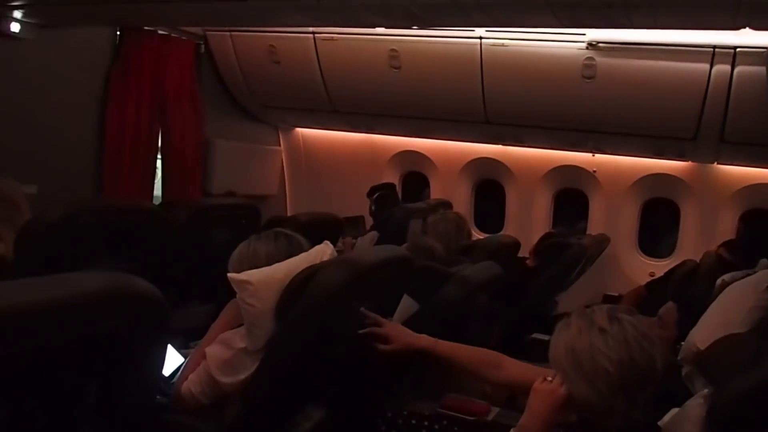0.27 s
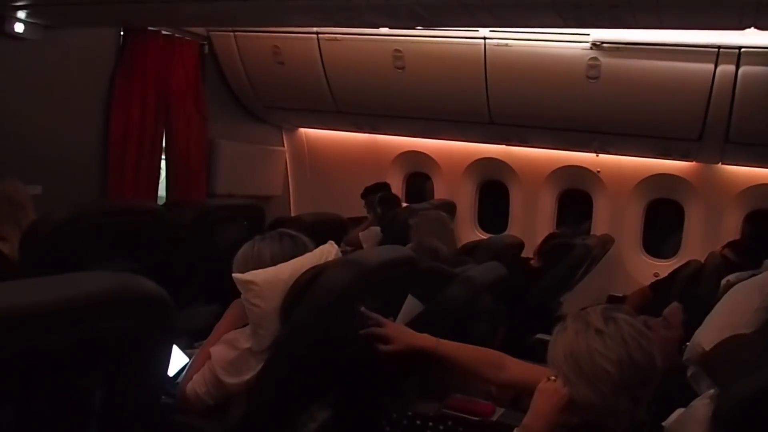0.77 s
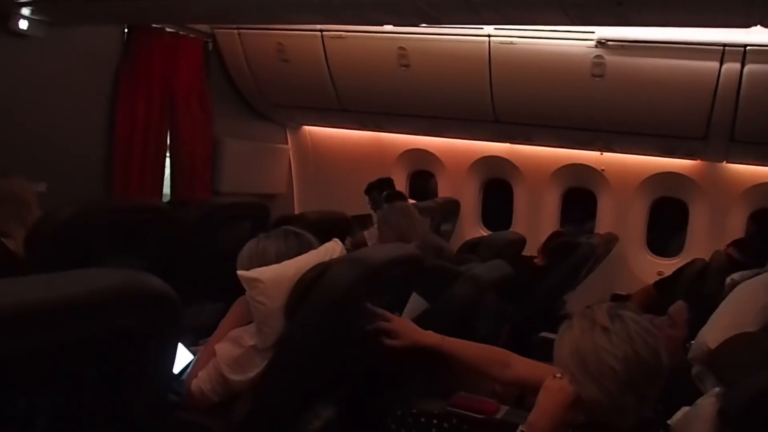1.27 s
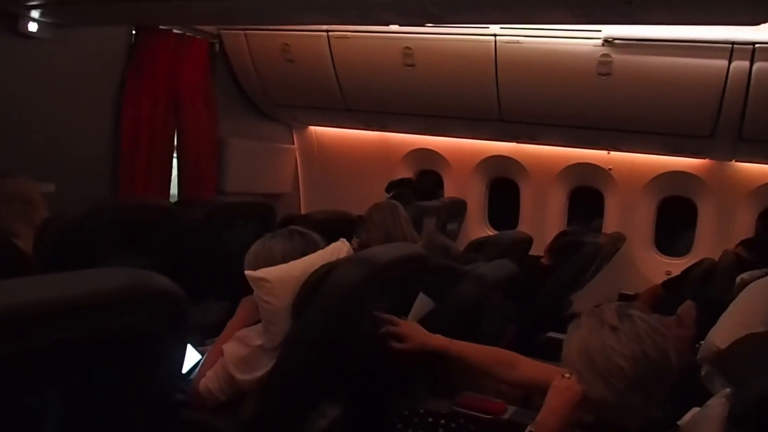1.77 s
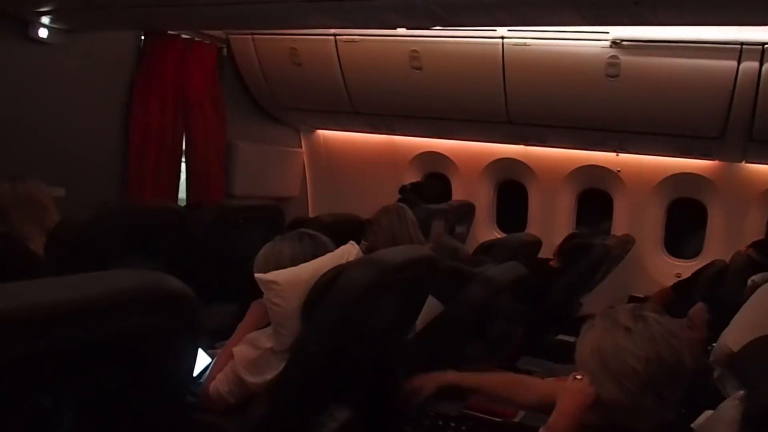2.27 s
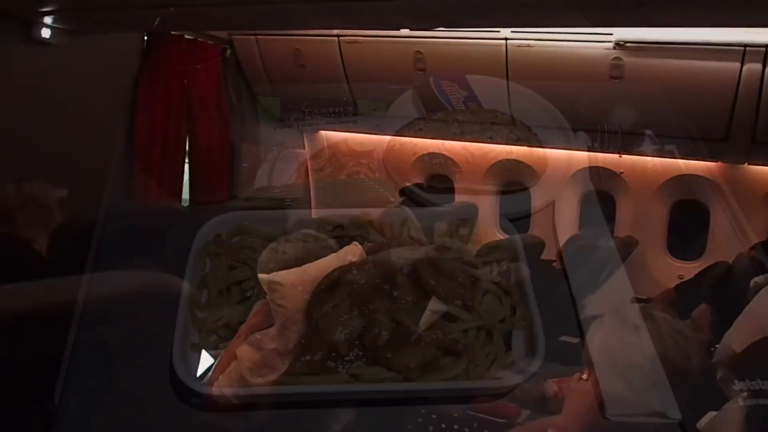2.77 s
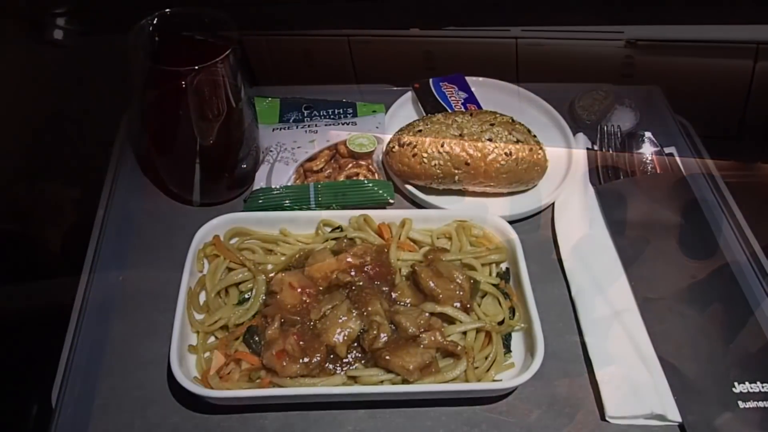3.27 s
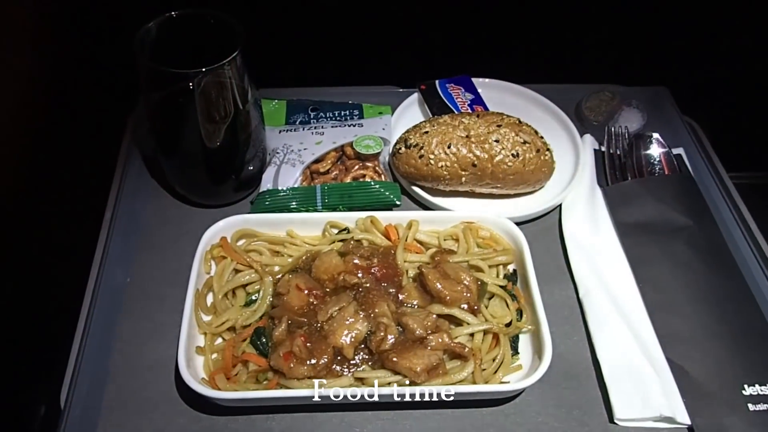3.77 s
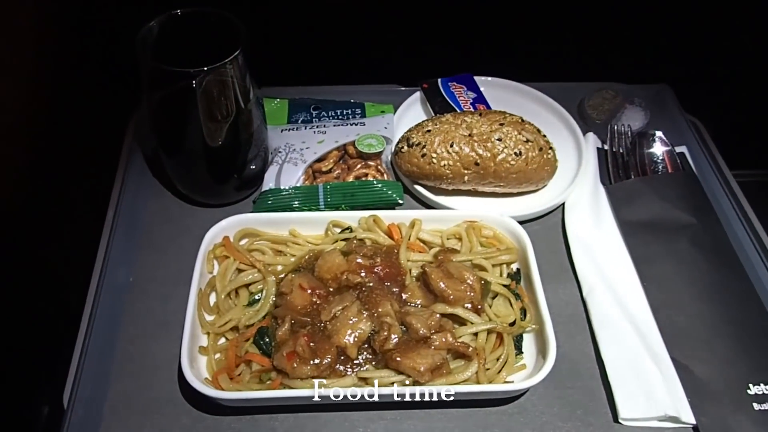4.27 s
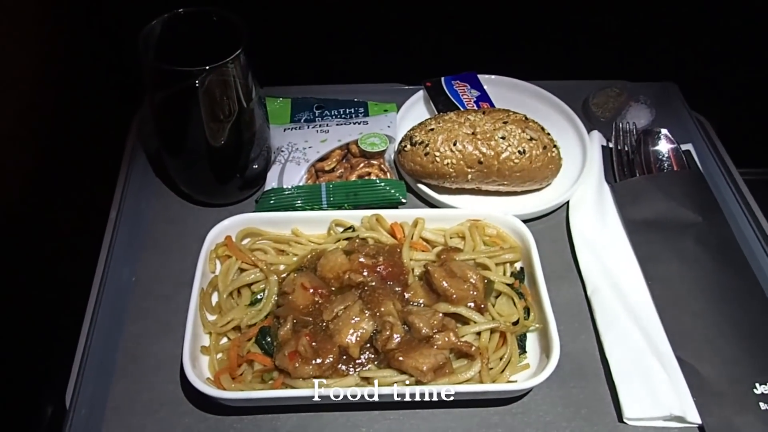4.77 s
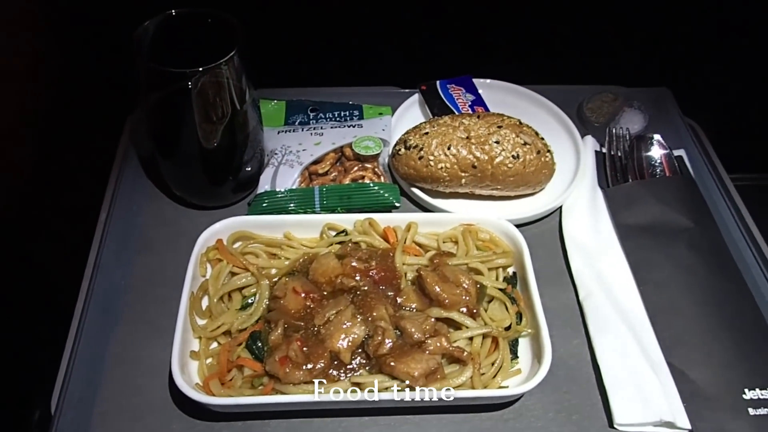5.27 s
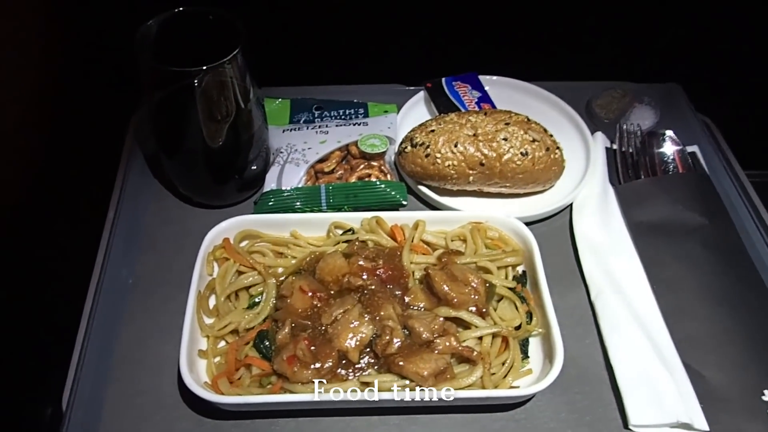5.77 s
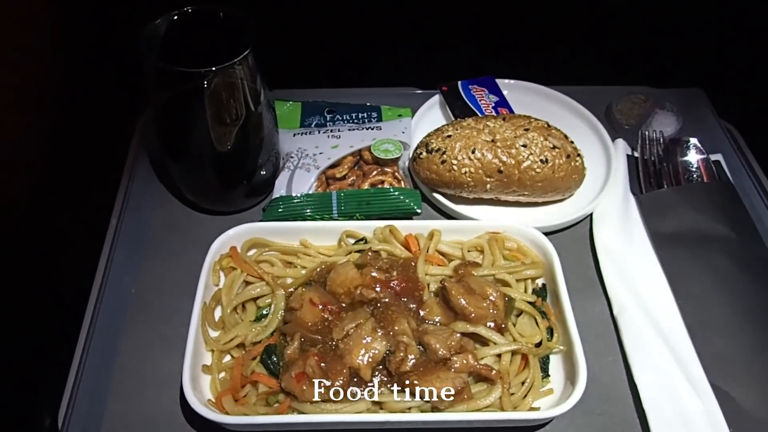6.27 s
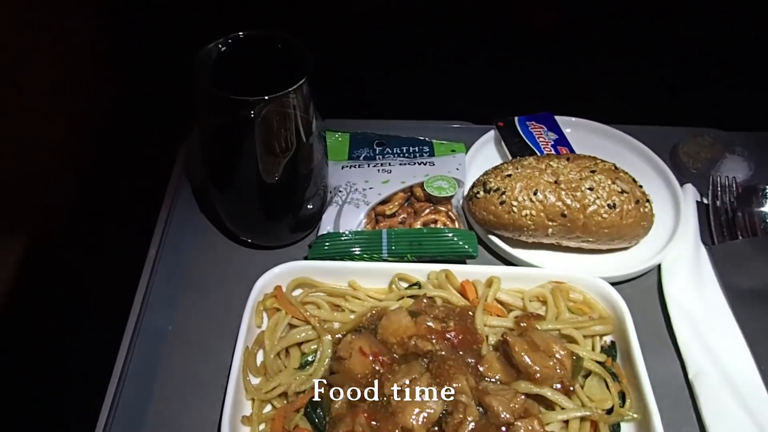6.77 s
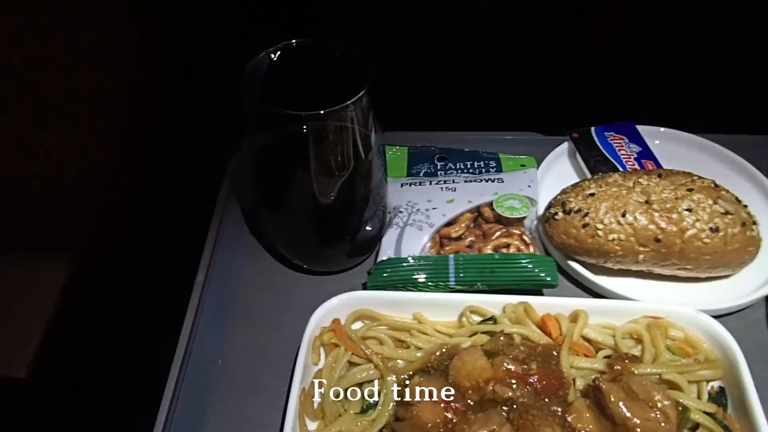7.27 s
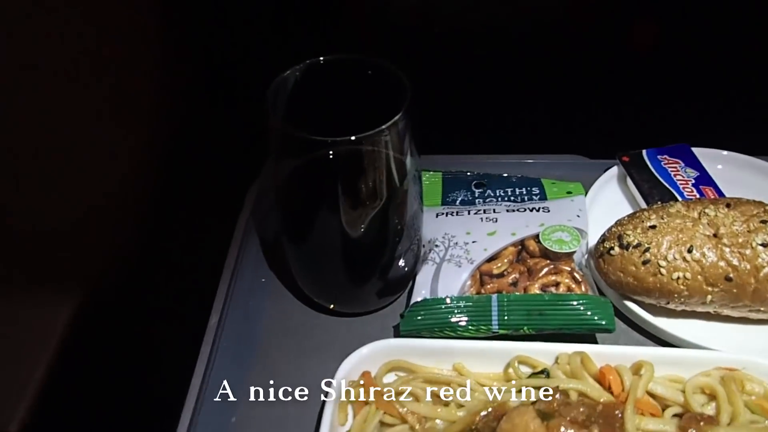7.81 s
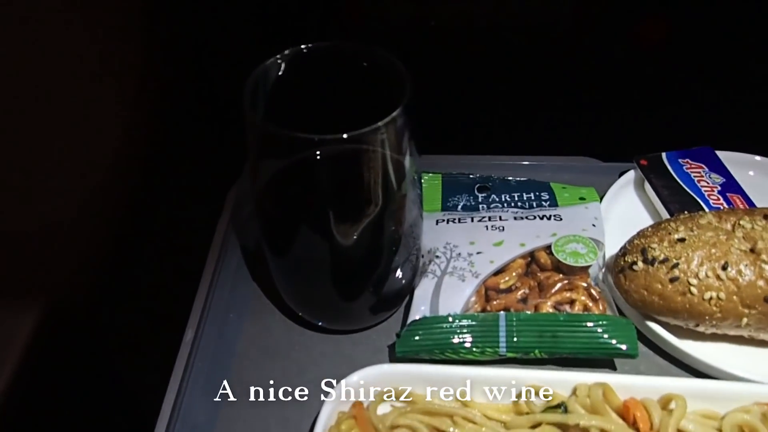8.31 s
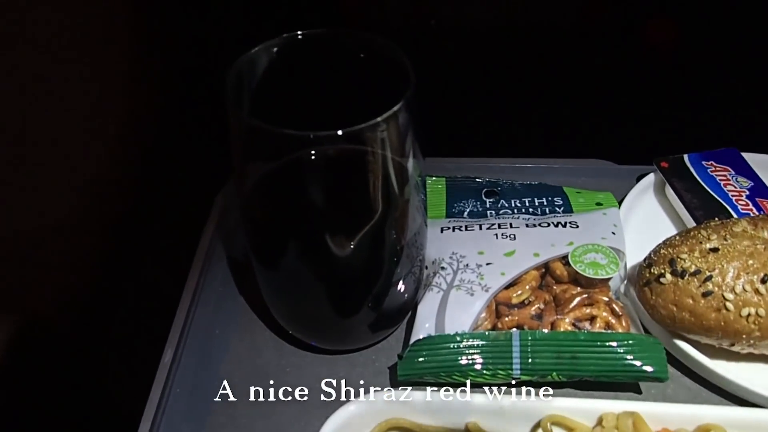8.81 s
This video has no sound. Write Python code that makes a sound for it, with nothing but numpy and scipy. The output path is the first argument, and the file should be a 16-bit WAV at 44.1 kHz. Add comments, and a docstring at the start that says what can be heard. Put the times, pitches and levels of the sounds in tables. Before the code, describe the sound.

Steady low roar and droning engines inside an airliner cabin in cruise, with faint air hiss, then small tray ticks, cutlery and glass clinks.

```python
"""Cabin of an airliner in cruise: seat rows, then, after a dissolve from 2.85 to 3.67 s, close over a meal tray.
From the start: wall roar, engine drone and vent hiss (shaped random spectra), thin whines (sines of wavering level).
From 4 s: ticks and soft knocks (noise bursts); at 5.5 s cutlery and at 8.9 s glass clinks (decaying modes, clatter).
From 7.7 s: a wrapper rustles (random crackles). A two-port microphone colours the sound; a limiter holds down peaks."""
import sys
import numpy as np
from scipy import signal
from scipy.fft import rfft, irfft
from scipy.io import wavfile
from scipy.ndimage import uniform_filter1d

SR = 44100
rng = np.random.default_rng(int(sys.argv[2]) if len(sys.argv) > 2 else 0)


def pcm_store(signal):
    """Save signal as 16-bit PCM."""
    levels = np.round(np.clip(np.atleast_2d(signal), -1, 1) * 32767)
    wavfile.write(sys.argv[1], SR, levels.astype(np.int16).T)


N = 399105

# dissolve from rows to tray: start_s, end_s
DISSOLVE_S = (2.85, 3.67)
# roar through the walls, rows then tray: freq_hz, density_db_per_hz (relative)
ROAR_SPECTRA = [
    [(12, -39.5), (20, -14), (58, -15), (91, 1), (136, -0.5), (171, -7.5), (194, -5), (220, -2),
     (295, -3.5), (357, -5.5), (657, -9), (1180, -10.5), (1880, -18.5), (2370, -22), (3050, -41),
     (3960, -58), (6710, -120)],
    [(12, -53), (20, -11), (60, -12.5), (133, -3), (194, -4.5), (220, -6), (372, -5.5), (450, -12.5),
     (567, -8.5), (920, -13), (1040, -12), (1690, -19.5), (1880, -22), (2370, -23), (3050, -42),
     (3960, -57), (6710, -120)],
]
# roar level, rows then tray: level_db
ROAR_LEVELS_DB = [-18.5, -19]
# engine drone the cabin favours, rows then tray: centre_hz, width_hz, level_db
DRONE_BANDS = [
    [(37, 4.8, -37), (62, 13, -38), (90.2, 9.7, -34), (209, 30, -35.5), (357, 41, -33)],
    [(37, 8.7, -42.5), (62, 12, -38), (91.3, 18, -31.5), (128.1, 7.9, -28), (197.7, 6.2, -37.5),
     (361.6, 24, -35)],
]
# vent hiss, rows then tray: freq_hz, density_db_per_hz (relative)
HISS_SPECTRA = [
    [(2600, -40), (3300, -5), (3700, -1), (4100, -5.5), (4500, 1), (5200, 1), (6500, -7), (7200, -6.5),
     (8000, -2), (9000, -10), (10000, -13), (12000, -14.5), (15700, -14.5)],
    [(2600, -40), (3300, -10), (3700, -2), (4100, -4), (4500, 3.5), (5200, 2), (6500, -3), (7200, -1),
     (8000, 5), (9000, -2.5), (10000, -7), (12000, -8.5), (15700, -9)],
]
# hiss level, rows then tray: level_db
HISS_LEVELS_DB = [-55.5, -54.5]
# the two microphone ports, rows then tray: freq_hz, likeness_0_to_1, left_lag_rad, left_minus_right_db
PORT_RESPONSES = [
    [(60, .9995, .005, -4), (300, 0.96, .025, -4), (905, 1, .1, -4.5), (1490, 0.92, 0.33, -2.5),
     (2300, 0.8, 0.58, -7), (3060, .8, .5, -7), (3450, 0.45, .1, 0), (4330, 0.66, 0.6, -3),
     (5200, .73, 1.3, -0.5), (6800, .4, 2.8, -5), (8000, .45, 2.5, -10), (10000, .2, 2.5, -8.5),
     (15000, .05, 2.5, -5)],
    [(60, 0.99, .001, -4.5), (300, 1, .001, -4), (900, 0.99, .001, -3.5), (2800, 1, .01, -4),
     (3900, 0.95, .05, -0.5), (4400, 0.93, .2, -3), (5500, 0.76, .35, -2.5), (7000, 0.5, .4, -4),
     (8200, .67, .35, -5), (10000, .25, .3, -3), (12000, .15, 2.3, -4), (14000, .3, 2.5, -3)],
]
# nulls of cabin and microphone housing: centre_hz, width_hz, depth_db
NULLS = [(53, 8, 3), (117, 16, 1), (190, 9.3, 0.5), (1870, 76, 14.5), (3410, 140, 14), (4860, 63, 15)]
# whines of fixed pitch: pitch_hz, mean_level_db, left_minus_right_db
WHINE_TONES = [(4338, -71, 3), (5475, -76.5, -4), (5629, -79.5, -4), (8009, -78, -4), (8807, -79.5, -4),
               (10003, -86, -4)]
# highest whine, joined in time: time_s, left_db, right_db, left_lead_rad
HIGH_WHINE_COURSE = [(0, -81, -72, 2), (1.5, -85, -74, 2), (2.75, -86, -80, 2), (3.05, -70, -68, 2.9),
                     (3.4, -66, -72, 2.9), (5.85, -67, -74, 2), (5.92, -67, -66, 1.6), (7.2, -65, -68, 1.6),
                     (7.9, -66, -67, 1.2), (8.1, -68, -60, 1.5), (8.25, -67, -69, 1.4),
                     (9.05, -72, -68, 1.3)]
# highest whine drops out for a moment: centre_s
HIGH_GAPS_S = [6.55, 8.18, 8.51, 8.93]
# brief level dips of air and whines: lowest_s, depth_db
LEVEL_DIPS = [(2.312, 5), (2.78, 3), (3.57, 1.5), (4.42, 2.5), (4.95, 2), (5.58, 2), (7.69, 2)]
# dry ticks: start_s, peak_db, centre_hz, decay_s
TICK_EVENTS = [(4.037, -44, 8200, .003), (4.047, -37, 8200, .004), (4.116, -44, 8000, .005),
               (4.247, -45, 9000, .002), (4.859, -46, 9000, .003), (5.258, -42, 5500, .012),
               (5.302, -37, 7000, .0023), (5.44, -43, 8300, .005), (5.821, -40, 7500, .004),
               (6.226, -34, 11000, .001), (6.831, -42, 8200, .008), (6.88, -42, 4600, .008),
               (6.994, -45, 9000, .003), (7.83, -41, 8200, .004), (7.875, -39, 9000, .003),
               (7.893, -41, 12000, .003), (7.916, -36, 8300, .0044), (8.455, -42, 9500, .003),
               (8.729, -40, 9000, .004)]
# soft knocks on the tray: start_s, level_db
KNOCK_EVENTS = [(4.29, -18), (4.318, -18), (6.372, -20)]
# clinks: start_s, ring_peak_db, left_minus_right_db, thing (0 cutlery, 1 glass)
CLINK_EVENTS = [(5.49, -27.5, -3, 0), (5.516, -33, -2, 0), (5.532, -42, -2, 0), (8.914, -22.5, -2, 1),
                (8.934, -30, -7, 1)]
# ring modes, cutlery then glass: mode_hz, level_db, t60_s
RING_MODES = [
    [(2700, -4, .09), (2810, 0, .1), (3690, -22, .08), (4070, -20, .08), (4700, -18, .1), (5870, -18, .1),
     (6440, -18, .08), (8230, -18, .08), (9550, -25, .08), (11900, -29, .08), (13900, -28, .09)],
    [(2450, -2, .09), (2580, 0, .1), (2730, -2, .09), (3950, -22, .08), (4690, -16, .12), (5630, -21, .07),
     (6150, -22, .07), (7450, -19, .07), (7760, -14, .1), (7920, -15, .1), (8320, -19, .08),
     (9920, -14, .06)],
]
# clatter, cutlery then glass: rattle_hz, rattle_re_ring_db, body_hz, body_re_ring_db
CLATTER_BANDS = [(5400, -9, 2800, -2), (6800, -15, 2500, 3)]
# limiter threshold, full scale 1: left, right
LIMIT_THRESHOLDS = (.275, .435)

HIGH_HZ, GAP_HALF_S, GAP_DB = 11199, .045, 14
DIP_FALL_S, DIP_RECOVER_S = .015, .07
TICK_CYCLES = 3.5  # the fewer cycles in a tick's decay, the wider its band
KNOCK_HZ, KNOCK_WIDTH, KNOCK_DECAY_S = 1800, .27, .022  # widths: half band over centre
SCRAPE_HZ, SCRAPE_WIDTH, SCRAPE_RE_KNOCK_DB = 6400, .36, -26  # bright edge of a knock
TRAY_PAN_DB = -3  # left minus right
RUSTLE_START_S, RUSTLE_PEAK_S, RUSTLE_PEAK_DB = 7.715, 7.9, -45.5
RUSTLE_RISE_DB_PER_S, RUSTLE_FALL_DB_PER_S = 55, 120
CRACKLES_PER_S = 1400
# wrapper colour: freq_hz, gain_db
RUSTLE_COLOUR = [(3000, -40), (5000, -7), (6800, -11), (8100, 5), (9300, -11), (12000, -16), (16000, -22)]
BASS_CUT_HZ, EDGE_HZ = 32, 15750
LIMITER_SHARE, LIMITER_RECOVERY_DB_PER_S = .85, 180.0  # share of the excess dB removed


def gain_of(db):
    """Decibels to gain."""
    return 10 ** (np.asarray(db) / 20)


def evened(x):
    """Scales to rms 1."""
    return x / np.sqrt(np.mean(x ** 2) + 1e-20)


def read(points, hz):
    """Table columns interpolated on a log-frequency axis."""
    f, *columns = np.transpose(points)
    return [np.interp(np.log(hz + 1), np.log(f + 1), c) for c in columns]


def curve(rows):
    """Table columns interpolated in time, one value a sample."""
    time_s, *columns = np.transpose(rows)
    return [np.interp(np.arange(N) / SR, time_s, c) for c in columns]


def sides(pan_db):
    """Left and right gains for a level difference."""
    return gain_of(np.clip(pan_db, -20, 20) * np.array([[.5], [-.5]]))


def add(mix, start_s, sound):
    """Mixes a short sound in at start_s, cut off at the end of the mix."""
    part = mix[:, round(start_s * SR):][:, :sound.shape[1]]
    part += sound[:, :part.shape[1]]


def waver():
    """Slow random curve of rms 1, ten points a second."""
    return evened(np.interp(np.arange(N) / SR, np.arange(100) / 10, rng.standard_normal(100)))


def dips_db(rows, fall_s, recover_s):
    """Sum of brief dips, each a bell with its own fall and recovery widths."""
    t = np.arange(N) / SR
    total_db = 0
    for lowest_s, depth_db in rows:
        width_s = np.where(t < lowest_s, fall_s, recover_s)
        total_db = total_db + depth_db * np.exp(-((t - lowest_s) / width_s) ** 2)
    return total_db


def airflow(power, ports, patchy_db, flicker_db, size):
    """Random short-time spectra with drifting patches and a shared flicker, as the two ports pick them up."""
    frames, hz = 4 * N // size + 8, np.fft.rfftfreq(size, 1 / SR)
    a, b, c, d, patches = rng.standard_normal((frames, len(hz), 5)).T
    patches = uniform_filter1d(patches, size=size // 80, axis=0)
    patches = evened(uniform_filter1d(patches, size=8192 // size + 2, axis=1))
    flicker = evened(uniform_filter1d(rng.standard_normal(frames), size=4096 // size + 1))
    likeness, lag_rad, pan_db = (v[:, None] for v in read(ports, hz))
    likeness = np.clip(likeness, 0, 1)
    right = a + 1j * b
    shared = likeness * np.exp(-1j * lag_rad) * right
    left = shared + np.sqrt(1 - likeness ** 2) * (c + 1j * d)
    spectra = np.array([left * gain_of(pan_db / 2), right / gain_of(pan_db / 2)])
    spectra *= np.sqrt(power(hz))[:, None] * gain_of(patchy_db * patches + flicker_db * flicker)
    out = signal.istft(spectra, nperseg=size, noverlap=3 * size // 4)[1][:, :N]
    return out / np.sqrt(np.mean(out.mean(0) ** 2))  # rms 1 for the mean of both sides


def roar(k):
    """Airflow through the walls: broad low noise, slightly uneven."""
    power = lambda hz: gain_of(2 * read(ROAR_SPECTRA[k], hz)[0])
    return gain_of(ROAR_LEVELS_DB[k]) * airflow(power, PORT_RESPONSES[k], 0.3, .15, size=4096)


def drone(k):
    """Engine drone: resonance curves filled with noise."""
    def power(hz):
        return sum(gain_of(2 * db) / w / (1 + (2 * (hz - f) / w) ** 4) for f, w, db in DRONE_BANDS[k])
    total_power = sum(gain_of(2 * db) for _, _, db in DRONE_BANDS[k])
    return np.sqrt(total_power) * airflow(power, PORT_RESPONSES[k], 0.51, 0.36, size=8192)


def hiss(k):
    """Vent hiss: treble noise, patchy and flickering."""
    power = lambda hz: gain_of(2 * read(HISS_SPECTRA[k], hz)[0])
    return gain_of(HISS_LEVELS_DB[k]) * airflow(power, PORT_RESPONSES[k], 1.4, 0.87, size=512)


def place(k):
    """Air sounds of the rows (0) or the tray (1)."""
    return roar(k) + drone(k) + hiss(k)


def whines():
    """Sines of wavering level; the highest reaches the ports out of step and changes in each on its own."""
    t = np.arange(N) / SR
    tone = lambda hz, lead_rad: np.sqrt(2) * np.sin(2 * np.pi * hz * t + lead_rad)
    out = np.zeros((2, N))
    for hz, db, pan_db in WHINE_TONES:
        level = gain_of(db + 2.7 * waver())
        out += sides(pan_db) * level * tone(hz, 2 * np.pi * rng.random())
    left_db, right_db, lead_rad = curve(HIGH_WHINE_COURSE)
    high_db = np.array([left_db + 1.2 * waver(), right_db + 1.2 * waver()])
    high_db -= dips_db([(s, GAP_DB) for s in HIGH_GAPS_S], GAP_HALF_S, GAP_HALF_S)
    return out + gain_of(high_db) * tone(HIGH_HZ, np.array([lead_rad, 0 * lead_rad]))


def snap(hz, width, decay_s):
    """Decaying band-passed noise around hz, peak 1, partly different in the two ports."""
    burst = rng.standard_normal((3, 4000)) * np.exp(-np.arange(4000) / SR / decay_s)
    edges_hz = np.clip([(1 - width) * hz, (1 + width) * hz], 500, .48 * SR)
    band = signal.butter(3, edges_hz, "band", fs=SR, output="sos")
    burst = signal.sosfilt(band, 0.32 * burst[:2] + burst[2])
    return burst / abs(burst).max()


def ticks():
    """Dry ticks of plastic and paper near the tray: the shorter the burst, the wider its band."""
    out = np.zeros((2, N))
    for start_s, db, hz, decay_s in TICK_EVENTS:
        width = min(np.sqrt(TICK_CYCLES / (hz * decay_s)) / 2, .45)
        add(out, start_s, gain_of(db) * snap(hz, width, decay_s))
    return sides(TRAY_PAN_DB) * out


def knocks():
    """Soft knocks on the tray: a mid-band noise burst with a faint bright edge."""
    out = np.zeros((2, N))
    for start_s, db in KNOCK_EVENTS:
        edge = gain_of(SCRAPE_RE_KNOCK_DB) * snap(SCRAPE_HZ, SCRAPE_WIDTH, KNOCK_DECAY_S)
        add(out, start_s, gain_of(db) * (snap(KNOCK_HZ, KNOCK_WIDTH, KNOCK_DECAY_S) + edge))
    return sides(TRAY_PAN_DB) * out


def clinks():
    """Each touch rings the modes in a new mix over grainy clatter; nearby surfaces smear the ring."""
    t, out = np.arange(8000) / SR, np.zeros((2, N))
    clatter_rise = 1 - np.exp(-t[:4000] / .004)
    for start_s, db, pan_db, thing in CLINK_EVENTS:
        k = int(round(thing))
        hz, mode_db, t60_s = np.transpose(RING_MODES[k])[:, :, None]
        rattle_hz, rattle_db, body_hz, body_db = CLATTER_BANDS[k]
        spread_db, turn = rng.standard_normal(hz.shape), rng.random(hz.shape)
        modes = gain_of(mode_db + spread_db - 60 * t / t60_s) * np.sin(2 * np.pi * (hz * t + turn))
        ring = modes.sum(0) * (1 - np.exp(-t / .001))
        echoes = .06 * rng.standard_normal((2, 2000)) * np.exp(-t[:2000] / .01)
        echoes[:, 0] = 1  # direct sound
        ring = signal.fftconvolve(ring[None], echoes, axes=1)
        add(out, start_s, sides(pan_db) * gain_of(db) * ring / abs(ring).max())
        rattle = gain_of(db + rattle_db) * clatter_rise * snap(rattle_hz, .42, .03)
        add(out, start_s, sides(pan_db) * rattle)
        body = gain_of(db + body_db) * clatter_rise * snap(body_hz, .08, .03)
        add(out, start_s, sides(pan_db) * body)
    return out


def rustle():
    """Wrapper crushed harder and harder, then let go: dense crackles, louder right; microphone favours 8 kHz."""
    t = np.arange(N) / SR
    grains = gain_of(2.4 * rng.exponential(1, N)) * (rng.random(N) < CRACKLES_PER_S / SR)
    puffs = signal.lfilter([1], [1, -.98], grains) * rng.standard_normal((3, N))
    (colour_db,) = read(RUSTLE_COLOUR, np.fft.rfftfreq(N, 1 / SR))
    crackle = irfft(rfft(puffs[:2] + 0.8 * puffs[2]) * gain_of(colour_db), N)
    slope_db_per_s = np.where(t < RUSTLE_PEAK_S, RUSTLE_RISE_DB_PER_S, RUSTLE_FALL_DB_PER_S)
    level_db = RUSTLE_PEAK_DB - abs(t - RUSTLE_PEAK_S) * slope_db_per_s
    onset = np.clip((t - RUSTLE_START_S) / 0.014, 0, 1)
    return sides(-3) * gain_of(level_db) * onset * evened(crackle)


def scene():
    """The two places cross at equal power; air and whines waver and dip; small sounds lie on top."""
    start_s, end_s = DISSOLVE_S
    share = np.clip((np.arange(N) / SR - start_s) / (end_s - start_s), 0, 1)
    air = np.cos(share * np.pi / 2) * place(0) + np.sin(share * np.pi / 2) * place(1)
    level_db = .5 * waver() - dips_db(LEVEL_DIPS, DIP_FALL_S, DIP_RECOVER_S)
    return gain_of(level_db) * (air + whines()) + ticks() + knocks() + clinks() + rustle()


def record(dry):
    """Bass cut and nulls, a fast limiter with one gain for both channels, then the band limit."""
    hz = np.fft.rfftfreq(N, 1 / SR)
    nulls_db = sum(db / (1 + (2 * (hz - f) / w) ** 2) for f, w, db in NULLS)
    bass_cut = np.sqrt(1 + (BASS_CUT_HZ / (hz + 1)) ** 12)
    x = irfft(rfft(dry) / gain_of(nulls_db) / bass_cut, N)
    peak = (abs(x) / np.array(LIMIT_THRESHOLDS)[:, None]).max(0, keepdims=True)
    cut_db = LIMITER_SHARE * 20 * np.log10(np.maximum(peak, 1))
    # gain falls at once on a peak, whose sharp corner leaves a faint tick, and recovers at a steady rate
    recovery_db = np.arange(N) * LIMITER_RECOVERY_DB_PER_S / SR
    cut_db = np.maximum.accumulate(cut_db + recovery_db, axis=1) - recovery_db
    limited = x / gain_of(cut_db)
    low_pass = signal.firwin(2047, EDGE_HZ, window=("kaiser", 9), fs=SR)
    return signal.oaconvolve(limited, low_pass[None], "same")


dry = scene()
out = record(dry)
pcm_store(out)
```